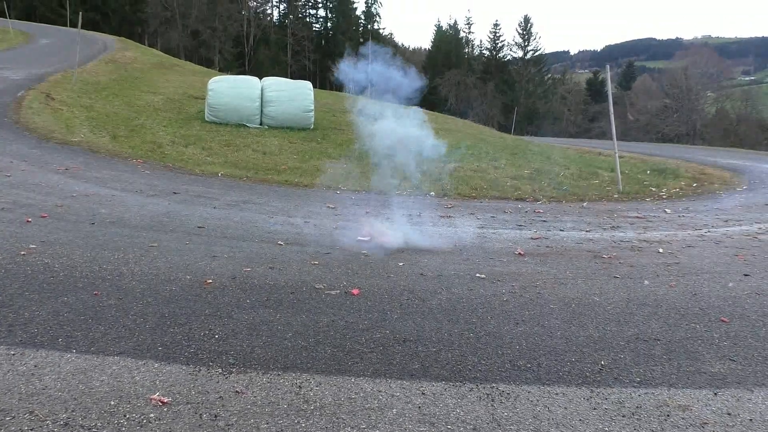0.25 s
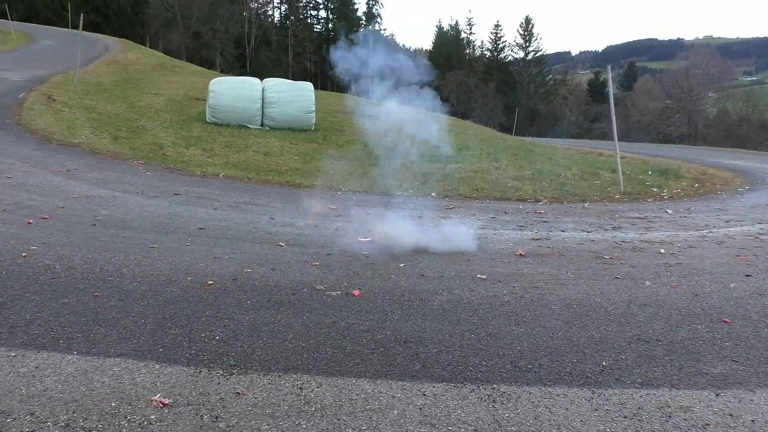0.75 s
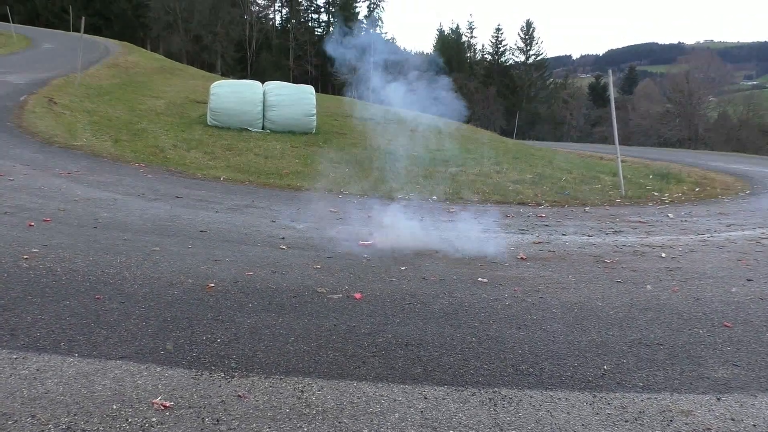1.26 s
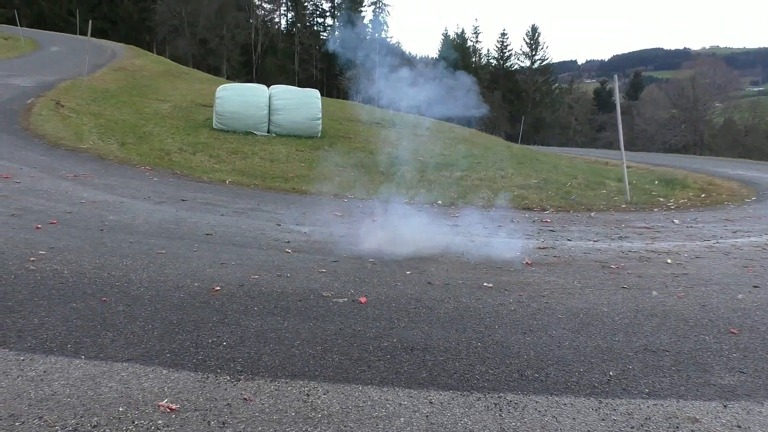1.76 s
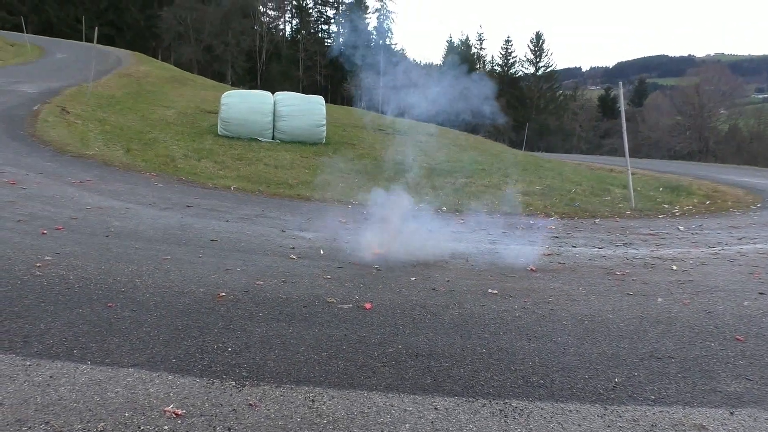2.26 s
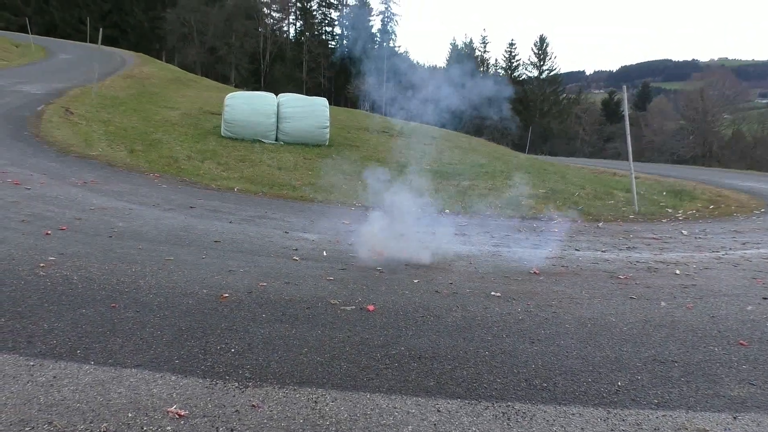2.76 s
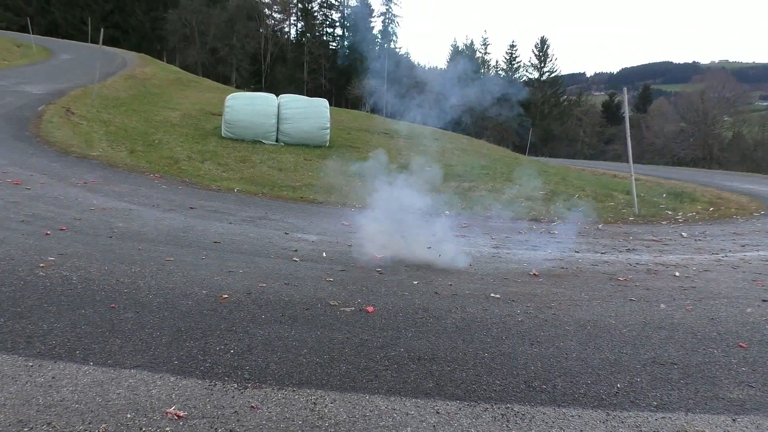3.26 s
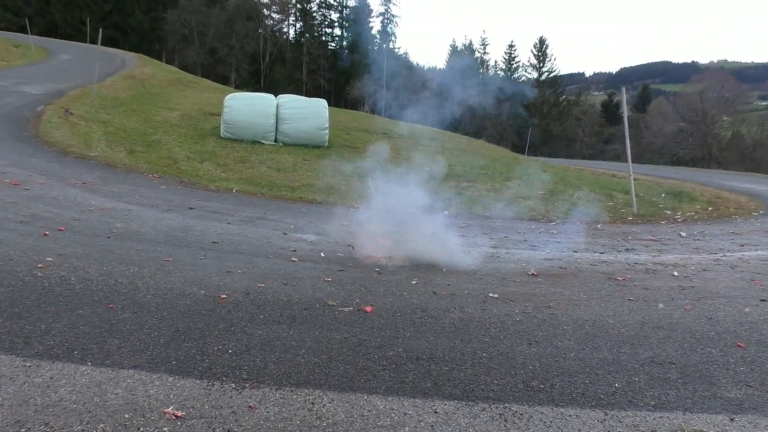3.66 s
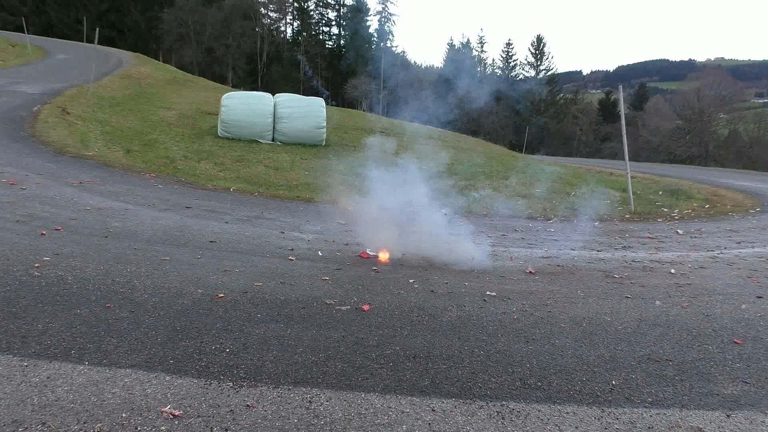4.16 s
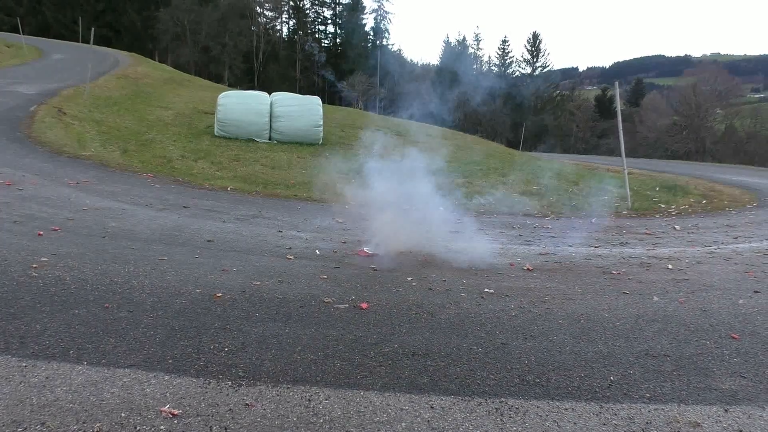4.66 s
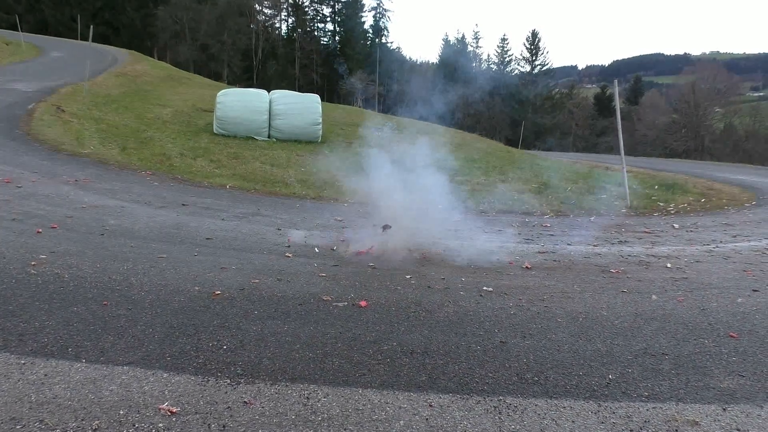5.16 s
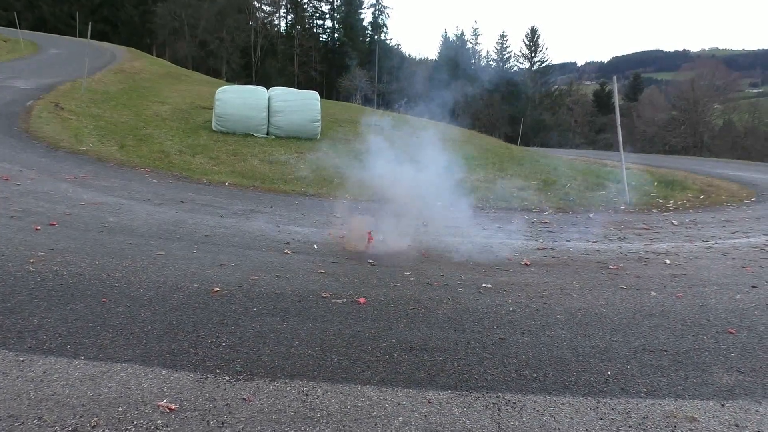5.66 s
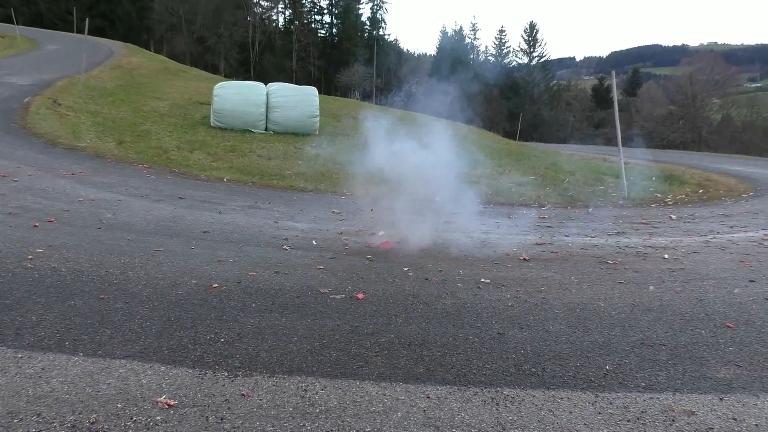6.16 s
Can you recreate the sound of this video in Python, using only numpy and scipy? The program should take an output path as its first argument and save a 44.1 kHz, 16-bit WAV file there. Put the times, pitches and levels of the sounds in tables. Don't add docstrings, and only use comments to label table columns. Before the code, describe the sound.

Irregular sharp bangs, about two dozen in six seconds, first spaced, then crowding together around the middle, then spaced again, with one last crack at the end. The small outdoor microphone overloads on each hit, and its automatic gain dips and recovers. Short wall slaps, scattered woodland echoes, dull far knocks and low valley rumble follow, over thin bright fuse fizz.

```python
import sys
import numpy as np
from scipy import signal
from scipy.fft import rfft, irfft
from scipy.io import wavfile
from scipy.ndimage import uniform_filter1d

SR = 44100
rng = np.random.default_rng(int(sys.argv[2]) if len(sys.argv) > 2 else 0)


def to_wav(s):
    ch = np.atleast_2d(s).T
    pcm = np.round(np.clip(ch, -1, 1) * 32767)
    wavfile.write(sys.argv[1], SR, pcm.astype(np.int16))


def volts(x):
    e = np.asarray(x, float) / 20
    return 10 ** e


N = 283101
T = np.arange(N) / SR
WALL_S, ECHO_SHARE = 0.0628, 0.36


def colour(x, spectrum):
    hz, db = np.transpose(spectrum)
    bin_hz = np.arange(1025) * SR / 2048
    log_gain = np.log(volts(np.interp(np.log(bin_hz + 1), np.log(hz), db)))
    cepstrum = irfft(log_gain)
    cepstrum[1:1024] *= 2
    cepstrum[1025:] = 0
    response = irfft(np.exp(rfft(cepstrum)))
    response /= np.sqrt(np.sum(response ** 2))
    return signal.fftconvolve(x, response[None], axes=1)[:, :x.shape[1]]


def ring(t, hz, rise_s, fall_s):
    t = np.maximum(t, 0)
    return np.sin(2 * np.pi * hz * t) * (1 - np.exp(-t / rise_s)) * np.exp(-t / fall_s)


def pair(size, side_db):
    mid, side = rng.standard_normal((2, size))
    return np.array([mid + volts(side_db) * side, mid - volts(side_db) * side])


def grains(size, scatter_db, grain_s):
    density = uniform_filter1d(rng.exponential(size=size), int(grain_s * SR))
    gain = volts(scatter_db * density * np.sqrt(grain_s * SR))
    return gain / np.sqrt(np.mean(gain ** 2))


def add(out, x, s):
    i = int(s * SR)
    if i + x.shape[1] > 0:
        out[:, max(i, 0):i + x.shape[1]] += x[:, max(-i, 0):max(out.shape[1] - i, 0)]


# (time [s], peak [dB])
EARLIER_BLASTS = [
    (-0.84, -3),
    (-0.67, -2),
    (-.189, -6.5),
]


def echoes():
    return [(s + WALL_S, ECHO_SHARE * peak_db) for s, peak_db, *_ in [*EARLIER_BLASTS, *BLASTS]]


# (delay after slap [s], left [dB], right [dB])
WOOD_RETURN = [
    (-.01, -2, -19),
    (.082, -11.5, -14),
    (.097, 0.5, 4.5),
    (0.128, -8.5, -0.5),
    (.192, -7.5, -4.5),
    (.215, -25, -20),
    (.3, -14.5, -12.5),
    (.44, -20, -25.5),
    (.64, -43, -37),
]
# (frequency [Hz], density [dB])
WOOD_SPECTRUM = [(35, -55), (60, -28.5), (270, -5), (393, -3), (777, -14.5), (1030, 0.5), (1270, 0),
                 (1400, 2), (2040, 0), (2580, -3.5), (2830, -4.5), (3840, -7.5), (10800, -25.5),
                 (15400, -32), (16500, -50)]


def wood():
    delay_s, *sides_db = np.transpose(WOOD_RETURN)
    lead_s = 0.03
    t = np.arange(int(delay_s[-1] * SR)) / SR - lead_s
    shape = volts(np.array([np.interp(t, delay_s, db) for db in sides_db]))
    out = np.zeros((2, N))
    for s, echo_db in echoes():
        wash = pair(len(t), -7) * grains(len(t), 2.3, grain_s=0.002)
        add(out, volts(echo_db) * shape * wash, s - lead_s)
    return colour(out, WOOD_SPECTRUM)


def valley_gain(fall_s, rise_s=0.17):
    s, echo_db = np.transpose(echoes())[..., None]
    coarse_t = T[::100]
    since = np.maximum(coarse_t - s, 0)
    swell = (1 - np.exp(-since / rise_s)) * np.exp(-since / fall_s)
    power = np.sum(volts(2 * echo_db) * swell, axis=0)
    return np.interp(T, coarse_t, np.sqrt(power))


# (frequency [Hz], density [dB])
VALLEY_SPECTRUM = [(290, -34), (500, -33), (817, -16), (1080, -5), (1110, -4.5), (1340, -1), (1370, -2.5),
                   (1770, -1), (2020, -2.5), (5000, -21.5), (6500, -63), (11000, -120)]
# (frequency [Hz], density [dB])
VALLEY_LOW_SPECTRUM = [(24, -32), (40, -14), (139, -4), (162, -1.5), (199, 0.5), (333, -3), (700, -10.5),
                       (910, -19), (1540, -120)]


def valley():
    roll = colour(pair(N, -9) * grains(N, 1.86, grain_s=0.002), VALLEY_SPECTRUM)
    low = colour(pair(N, -16.5), VALLEY_LOW_SPECTRUM)
    return volts(-45) * valley_gain(fall_s=1) * roll + volts(-51.5) * valley_gain(fall_s=0.61) * low


# (time [s], level [dB])
BURN = [(0, -58.5), (.13, -47.5), (.27, -48.5), (.5, -50.5), (.75, -51), (1.2, -48), (1.4, -54.5),
        (1.9, -60), (2.05, -52), (2.3, -55.5), (2.65, -54.5), (3.3, -56), (4.1, -51), (4.5, -51.5),
        (4.78, -49), (5.1, -48.5), (5.6, -51), (6.42, -52.5)]
# (frequency [Hz], density [dB])
HISS_SPECTRUM = [(4000, -37), (7500, -10), (8700, -2), (10500, -2.5), (12000, -9.5), (15700, -17),
                 (16500, -52)]
# (frequency [Hz], density [dB])
SPUTTER_SPECTRUM = [(1500, -30), (3000, -2.5), (4000, -2), (7000, -4), (12000, -26), (16000, -26),
                    (16500, -53)]


def fuse():
    hiss_db = np.interp(T, *np.transpose(BURN))
    sputter_db = -51 + 0.42 * (hiss_db - np.mean(hiss_db))
    sputter = colour(pair(N, -12.5) * grains(N, 1.7, grain_s=0.0024), SPUTTER_SPECTRUM)
    hiss = colour(pair(N, -14) * grains(N, 0.63, grain_s=0.0012), HISS_SPECTRUM)
    return volts(sputter_db) * sputter + volts(hiss_db) * hiss


# (time [s], level [dB])
SLOW_GAIN = [(0, 1), (.25, -0.5), (.7, -0.5), (.95, -3.5), (1.25, 0.5), (1.5, 1.5), (2.0, 0), (2.6, -2),
             (3.3, -2), (4.2, -7.5), (4.7, -10), (5.0, -6.5), (5.8, -3.5), (6.05, -8.5), (6.42, -4.5)]


def duck():
    duck_db, recover_s, grip_s = 3.5, 0.17, 0.04
    hold_db, hold_s, release_s = -5, 0.15, 0.014
    t = T[::40]
    blast_s = np.array([s for s, _ in echoes()])[:, None] - WALL_S
    since = t - blast_s
    release = (1 - np.tanh((since - hold_s) / release_s)) / 2
    grip = 1 - np.exp(-np.maximum(since, 0) / grip_s)
    held = np.max(release * grip, axis=0)
    creep = np.max(np.exp(-np.abs(since) / recover_s) * (since > 0), axis=0)
    slow_db = np.interp(t, *np.transpose(SLOW_GAIN))
    gain_db = slow_db - held * np.maximum(slow_db - hold_db, 0) - duck_db * creep
    return volts(np.interp(T, t, gain_db))


# (delay after slap [s], level over wash [dB], ring [Hz])
FACES = [
    (0.25, 0, 1510),
    (.261, 14.5, 1606),
    (.277, 8, 1420),
    (.29, 6, 1500),
]


def faces():
    out = np.zeros((2, N))
    t = np.arange(300) / SR
    for s, echo_db in echoes():
        for delay_s, db, hz in FACES:
            size_db, detune_db, jitter = rng.standard_normal(size=3)
            knock = ring(t, hz * volts(1.25 * detune_db), rise_s=0.00048, fall_s=0.00075)
            knock *= 1 + 0.22 * rng.standard_normal(len(t))
            sides_db = echo_db + db + 2.5 * size_db + np.array([[5], [7]])
            add(out, volts(sides_db) * knock, s + delay_s - 0.001 + 0.0005 * jitter)
    return out


# (frequency [Hz], density [dB])
CRACK_SPECTRUM = [(290, -38), (500, -3), (1410, 2), (2460, 2), (5430, -4), (7270, -16), (8420, -6),
                  (9330, -5), (10500, -4.5), (12000, -29), (14300, -6.5), (15600, -7), (16500, -40)]
# (frequency [Hz], density [dB])
EDGE_SPECTRUM = [(1500, -24), (4500, -7), (6500, -4), (9500, -1.5), (12500, -7.5), (16000, -8.5),
                 (17000, -31)]
# (frequency [Hz], density [dB])
SCATTER_SPECTRUM = [(35, -33), (60, -7), (326, 4), (854, -9), (1650, 0), (1940, -1), (2640, -1.5),
                    (3500, -7), (4750, -13), (6450, -13.5), (12200, -13), (15400, -22), (16500, -41)]
# (delay [s], left [dB], right [dB], ring [Hz], edge [dB])
NEAR_ECHOES = [
    (.0044, 4, -3.5, 2400, -8),
    (0.0104, -34, -2, 2300, -22),
    (.037, -19.5, -17.5, 1900, 4.5),
]


def blast(peak_db, crack_db, body_db, thump_db, suction_db, low_db, low_hz, high_hz, high_db, body_hz):
    t = np.arange(4096) / SR
    fronts = (rng.random(len(t)) < 0.07) * np.exp(-(t / 0.0018) ** 3)
    fronts[[2, 28]] = 1
    shock = colour(pair(len(t), -7) * fronts, CRACK_SPECTRUM)
    shock = np.tanh(1.3 * shock / np.abs(shock).max())
    bright = colour(pair(len(t), -27) * (fronts + 0.069) * np.exp(-(t / 0.00092) ** 2), EDGE_SPECTRUM)
    out = volts(peak_db + 0.5) * shock + volts(crack_db + 10.5) * bright
    out += volts(low_db + 9) * ring(t - 0.0006, low_hz, 0.00089, 0.0014)
    out += volts(high_db + 7.5) * ring(t - 0.0003, high_hz, 0.0008, 0.0017)

    near_t = t[:400]
    for later, (delay_s, left_db, right_db, hz, edge_db) in enumerate(NEAR_ECHOES):
        edge = volts(edge_db + 0.3 * (crack_db + 12)) * rng.standard_normal(400)
        edge *= np.exp(-((near_t - 0.0003) / 0.0001) ** 2)
        edge = uniform_filter1d(edge, size=1 + 3 * later)
        front = edge - ring(near_t, hz * volts(1.44 * rng.standard_normal()), 0.0001, 0.00031)
        sides_db = peak_db + np.array([[left_db], [right_db]])
        add(out, volts(sides_db) * front, delay_s + 0.0003 * rng.standard_normal())

    detune = volts(0.5 * rng.standard_normal((2, 2, 1)))
    out += volts(body_db + 13) * ring(t, body_hz * detune[0] ** 0.75, 0.0016, 0.0025)
    out -= volts(thump_db + 6) * ring(t - 0.0005, 190 * detune[1], 0.0054, 0.0023)
    suction = np.exp(-((t - 0.002) / 0.00099) ** 2)
    suction = suction - 0.3 * detune[1] ** 4 * np.exp(-((t - 0.006) / 0.0012) ** 2)
    out -= volts(suction_db + 15.5) * detune[0] ** 4 * suction
    fade = volts(-10) * np.exp(-t / 0.0037) + volts(-22.5) * np.exp(-t / 0.018)
    scatter = pair(len(t), -4) * grains(len(t), 2.6, grain_s=0.0005) * fade
    out += volts(peak_db) * colour(scatter, SCATTER_SPECTRUM)
    return out * volts(np.array([[0.4], [-0.4]]))


# (low ring [dB/dB], upper ring [dB/dB], thump [dB/dB])
PARTS_SHARE = (0.91, 1.64, .3)


def charge(peak_db, crack_db, high_hz, suction_db, low_hz, body_db):
    chance = rng.standard_normal(size=4)
    scatter_db = np.array([0.7, 1.5, 2]) * chance[1:]
    parts_db = np.array(PARTS_SHARE) * peak_db + np.array([-7.5, -8.5, -29]) + scatter_db
    low_db, high_db, thump_db = parts_db
    body_hz = 320 * volts(0.5 * chance[0])
    return blast(peak_db, crack_db, body_db, thump_db, suction_db, low_db, low_hz, high_hz, high_db, body_hz)


# (delay [s], left [dB], right [dB])
AFTER_SLAP = [
    (.016, -22, -9),
    (.031, -3, -5),
]


def slap(peak_db, low_db):
    t = np.arange(2048) / SR
    swell = np.exp(-((t - 0.001) / 0.00055) ** 2)
    bend = volts(0.55 * rng.standard_normal())
    tick = volts(-7) * np.diff(uniform_filter1d(rng.standard_normal(len(t)), size=3), prepend=0)
    tones = np.sin(2 * np.pi * 2700 * bend * t) + volts(-11.5) * np.sin(2 * np.pi * 4500 * bend * t)
    high = swell * (tones + tick)
    low = ring(t - 0.0012, 278 * bend, 0.002, 0.0039) + volts(4) * ring(t - 0.001, 500, 0.00075, 0.0014)
    out = volts(peak_db + np.array([[4], [2]])) * high + volts(low_db + 12) * low
    for delay_s, left_db, right_db in AFTER_SLAP:
        late = ring(t[:400], 1970, 0.0002, 0.00042) + volts(-17) * (swell * tick)[:400]
        add(out, volts(peak_db + 8 + np.array([[left_db], [right_db]])) * late, delay_s)
    return out


# (time [s], peak [dB], crack [dB], upper ring [Hz], boom [dB])
BLASTS = [(0.292, -2, -21, 2540, -33), (0.527, -4, -8, 1800, -29), (0.5407, -9, -15, 2240, -38),
          (1.2704, -6.5, -11.5, 2620, -34), (1.292, -10, -20.5, 1890, -37), (1.6672, -3, -13.5, 1860, -33),
          (2.0492, -3.5, -5.5, 1950, -34), (2.1575, -13, -47, 2530, -45), (2.7639, -5.5, -6, 3020, -35),
          (2.9722, -3, -3.5, 2644, -30), (3.1245, -7.5, -9, 1920, -34), (3.469, -5.5, -9.5, 1900, -39),
          (3.583, -3.5, -17, 1650, -34), (3.7611, -3, -14, 1970, -32), (3.933, -4.5, -10, 1894, -28),
          (4.044, -4.5, -7, 1830, -34.5), (4.2778, -3, -10, 2680, -35.5), (4.816, -5, -14, 2470, -28.5),
          (5.1488, -3.5, -12.5, 1860, -34.5), (5.4791, -4, -9, 1890, -35), (5.6653, -4.5, -11.5, 2840, -33),
          (5.6863, -12, -19, 2700, -37.5), (6.3698, -3, -10.5, 2110, -35)]
# (low ground ring [Hz], body [dB], slap peak [dB])
PLACES = [(1210, -20, -27), (1700, -25, -31), (1110, -25, -33), (1330, -26, -42), (1100, -27, -34),
          (1050, -22, -30), (1700, -24, -31), (1000, -22, -46), (1210, -24, -31), (1370, -23, -26),
          (1520, -21, -31), (1160, -27, -30), (1540, -25, -22), (1080, -26, -25), (1164, -22, -25),
          (1170, -27, -29), (1000, -30, -34), (1160, -29, -24), (1530, -24, -22), (1160, -25, -23),
          (1150, -28, -19), (1150, -30, -29), (1356, -23, -27)]


def volley(out):
    for (s, peak_db, *kind), (*place, slap_db) in zip(BLASTS, PLACES):
        add(out, charge(peak_db, *kind, *place), s)
        add(out, slap(slap_db, low_db=-37 + ECHO_SHARE * peak_db), s + WALL_S)


# (time [s], level at blast [dB])
SWELLS = [
    (0.529, -24),
    (1.27, -29),
    (1.667, -21.5),
    (2.049, -29),
    (2.763, -19),
    (3.469, -35),
    (3.761, -33),
    (5.479, -32),
    (5.665, -38),
]
# (frequency [Hz], density [dB])
SWELL_SPECTRUM = [(200, -25), (1000, 0), (2500, 1.5), (5000, -3), (9500, 0.5), (13000, -3.5), (16000, -19),
                  (16500, -50)]


def swells(out):
    t = np.arange(-1323, 0) / SR
    for s, level_db in SWELLS:
        swell = colour(pair(len(t), -21), SWELL_SPECTRUM) * np.exp(t / 0.006)
        add(out, volts(level_db) * swell, s - 0.03)


# (time [s], peak [dB])
SPITS = [
    (5.8012, -48),
    (6.0122, -34),
]


def spits(out):
    t = np.arange(66) / SR
    for s, peak_db in SPITS:
        add(out, volts(peak_db) * pair(len(t), -12) * np.exp(-t / 0.00026), s)


def scene():
    far = (wood() + faces()) * volts(-34)
    out = (far + valley() + fuse()) * duck()
    volley(out)
    swells(out)
    spits(out)
    return out


def band_limit(x):
    return signal.sosfilt(signal.butter(12, 16980, fs=SR, output="sos"), x)


def record(dry):
    clipped = np.clip(dry, -0.8, 0.8)
    no_rumble = signal.sosfilt(signal.butter(1, 3, "high", fs=SR, output="sos"), clipped)
    top_cut = signal.ellip(7, 0.1, 55, 15900, fs=SR, output="sos")
    mix = signal.sosfilt(top_cut, no_rumble)
    return band_limit(mix)


dry = scene()
out = record(dry)
to_wav(out)
```